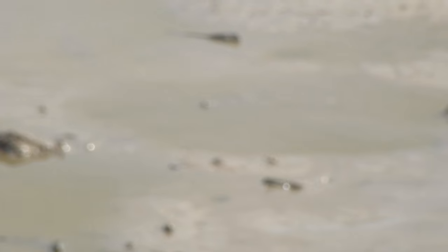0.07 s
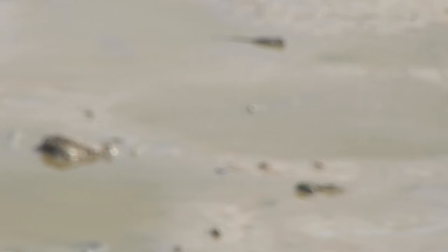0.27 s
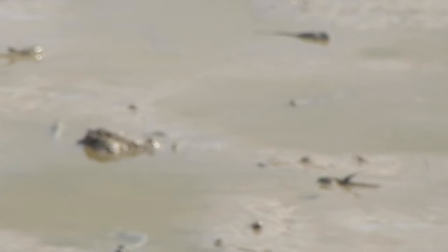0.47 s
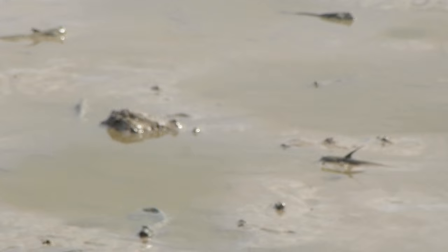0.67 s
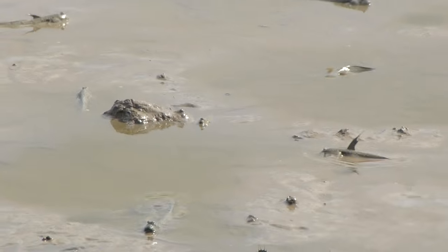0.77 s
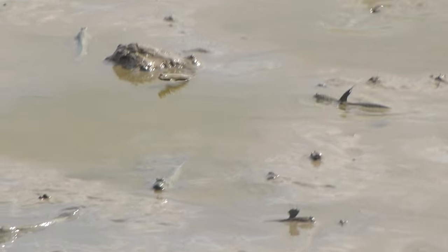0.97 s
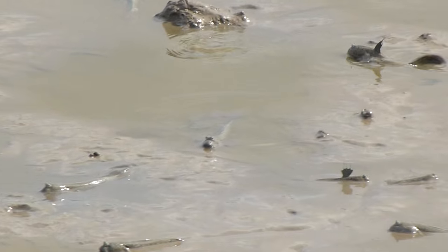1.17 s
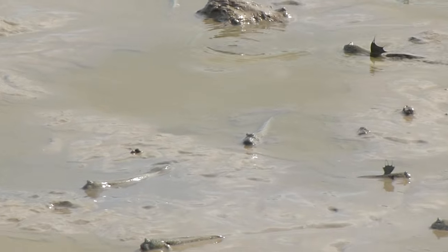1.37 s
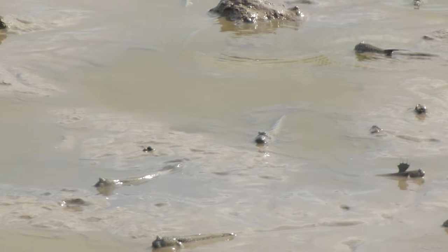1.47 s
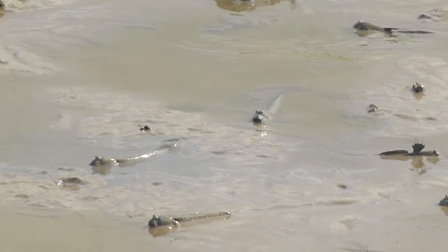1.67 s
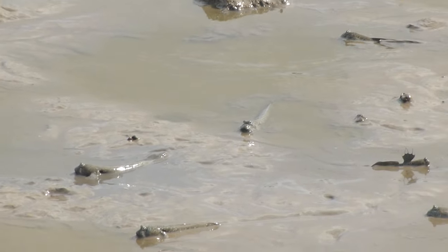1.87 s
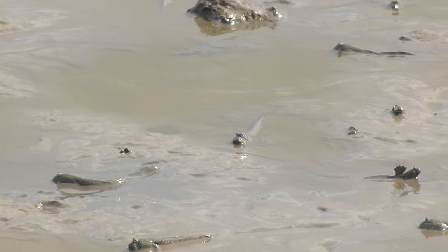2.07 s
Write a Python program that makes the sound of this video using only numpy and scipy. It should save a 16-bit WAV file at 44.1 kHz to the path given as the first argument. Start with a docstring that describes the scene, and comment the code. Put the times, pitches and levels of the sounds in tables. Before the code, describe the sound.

Low, gusty wind rumbles and thumps against the microphone on a tidal mudflat, heavier on the right. From the middle on, small wet smacks and bubble pops sound nearby, and the gusts ease near the end over a soft rush of air.

```python
"""Gusts of wind buffet a camera microphone on a tidal mudflat, mostly at its right port (opening).
The swirls of air rumble; the hardest ones thump, and the fastest rasp across the port's edge.
Close by, wet mud squelches and smacks, tiny bubbles pop, and one chirps as it surfaces.
A faint far tone rises twice as the wind drops. Under it all lie the even rush of open air
and the camera's faint whine; a thin high hiss stops just after the start."""
import sys
import numpy as np
from scipy import signal
from scipy.fft import rfft, irfft, next_fast_len
from scipy.io import wavfile
from scipy.ndimage import map_coordinates

SR = 44100
rng = np.random.default_rng(int(sys.argv[2]) if len(sys.argv) > 2 else 0)


def pcm_store(signal):
    """Save signal as 16-bit PCM."""
    levels = np.round(np.clip(np.atleast_2d(signal), -1, 1) * 32767)
    wavfile.write(sys.argv[1], SR, levels.astype(np.int16).T)


N = 92610  # 2.1 s

# tone colour of the open air, from low to high: f/Hz, level/dB
AIR_COLOUR = [(30, -29), (80, 12.5), (200, 6.5), (420, 2.5), (750, 1), (1050, -1.5), (1350, -7),
              (1800, -6.5), (2000, -8.5), (2300, -16.5), (2900, -19), (3600, -26.5), (4200, -22),
              (4900, -20), (5450, -22), (5900, -24), (8300, -24.5), (11000, -30), (15500, -35)]
# how alike left and right are in the air, hiss and squelches: f/Hz, likeness (1 = the same)
STEREO_LIKENESS = [(100, 0.69), (400, 0.62), (750, 0.83), (1100, 0.46), (8000, 0.6), (15000, 0.43)]
# how the air swells and sinks: t/s, relative level/dB
AIR_SWELL = [(0, -54), (.15, -53), (.26, -59), (.5, -56.5), (.7, -59), (1.0, -55.5), (1.1, -55.5),
             (1.3, -59.5), (1.55, -58), (1.82, -58.5), (2.1, -55)]
# tone colour of the thin hiss: f/Hz, level/dB
HISS_COLOUR = [(500, -8), (1500, 6.5), (3000, -5), (4000, -18), (6500, -4), (8000, 1), (10200, 2.5),
               (12000, -7), (15000, -19)]
# gusts at the microphone: start/s, end/s, strength/dB, extra treble/dB
GUSTS = [(0.061, 0.061, -34.5, 5.5), (0.193, 0.247, -22.5, 4), (0.25, 0.487, -27, -4.5),
         (0.5, 0.711, -27.5, -0.5), (.750, 0.841, -24, -2), (0.83, 0.892, -30.5, -15),
         (0.983, 1.071, -29.5, -7.5), (1.096, 1.348, -29, 3.5), (1.414, 1.502, -27, -4.5),
         (1.531, 1.708, -27.5, 4), (1.707, 1.829, -26.5, -1.5), (1.933, 2.007, -37.5, -16),
         (2.05, 2.09, -38, -24)]
# tone colour of wind buffeting a port: f/Hz, level/dB
BUFFET_COLOUR = [(25, -46), (48, -52), (70, -23.5), (100, -6), (135, -0.5), (210, 3), (340, -0.5),
                 (500, -16), (800, -26), (1300, -40), (2200, -67.5), (4000, -61.5), (10000, -77.5)]
# the left port's own buffeting, turned down by frequency: f/Hz, gain/dB
LEFT_PORT_GAIN = [(60, -19), (130, -9), (220, -18), (400, -12), (700, -7), (1500, -0.5)]
# how much of the right port's wind reaches the left channel: f/Hz, gain/dB
LEAK_GAIN = [(100, -4.5), (200, -12.5), (400, -19.5), (600, -7), (1000, -6), (1400, 2.5), (2000, -5)]
# how far that copy's waves run ahead: f/Hz, phase/rad
LEAK_PHASE = [(90, 1.68), (260, -1.5), (350, -5.5), (430, 1), (520, -3), (1350, -2.5), (1600, -2.4),
              (3000, -0.5)]
# the hardest swirls to hit the port: t/s, peak/dB, cutoff/Hz (higher is sharper)
THUMPS = [(0.052, -23, 650), (0.1788, -14, 790), (0.2015, -5, 610), (0.2265, -8.5, 470),
          (0.2345, -8.5, 1640), (0.2885, -10, 597), (0.3082, -6.5, 700), (0.392, -16, 610),
          (0.411, -11, 415), (0.436, -18.5, 665), (0.501, -22, 740), (0.5183, -14.5, 740),
          (0.532, -9.5, 370), (0.5708, -11.5, 660), (0.5789, -11.5, 610), (0.612, -19, 705),
          (0.6355, -8, 428), (0.647, -17, 510), (0.682, -31, 520), (0.7002, -13.5, 340), (0.763, -9.5, 416),
          (0.789, -14.5, 490), (0.886, -18.5, 507), (0.934, -15, 324), (0.992, -16.5, 550),
          (1.1041, -13, 448), (1.114, -9, 432), (1.182, -12, 700), (1.2114, -13, 730), (1.2204, -10, 520),
          (1.2531, -6.5, 582), (1.274, -15, 733), (1.2896, -16, 645), (1.302, -16, 485),
          (1.3270, -22, 1020), (1.3375, -6.5, 480), (1.418, -24, 744), (1.4985, -26, 440),
          (1.536, -13, 480), (1.577, -18, 620), (1.583, -11.5, 710), (1.6079, -9.5, 524),
          (1.618, -11.5, 660), (1.669, -12, 554), (1.704, -14.5, 1080), (1.7240, -12.5, 306),
          (1.7905, -8.5, 370), (1.939, -23, 800), (2.0052, -19.5, 287)]
# air tearing across the port's edge: t/s, width/s, level/dB
RASPS = [(0.18, 0.0035, -34), (0.201, 0.0029, -35), (0.447, .003, -34.5), (0.993, 0.0029, -40),
         (1.11, 0.011, -36), (1.188, 0.0089, -35.5), (1.2523, 0.0027, -28), (1.291, 0.0018, -36.5),
         (1.329, 0.0037, -28), (1.335, 0.0023, -33), (1.567, 0.0013, -24), (1.583, 0.0047, -36),
         (1.603, 0.0056, -38.5), (1.619, 0.0036, -33), (1.7064, 0.0033, -26.5)]
# tone colour of the rasps: f/Hz, level/dB
RASP_COLOUR = [(350, -18), (700, 6), (1150, 4), (1450, -8.5), (1900, -19), (2600, -34.5), (5000, -45)]
# soft squelches in the mud: t/s, width/s, level/dB
SQUELCHES = [(0.869, 0.25, -67), (1.515, 0.0094, -58), (1.635, 0.035, -60.5)]
# tone colour of the squelches: f/Hz, level/dB
SQUELCH_COLOUR = [(2000, -16), (3500, 2), (5200, 5), (7000, -5.5), (14000, -18)]
# wet smacks of mud: t/s, level/dB, fade time/s
SMACKS = [(0.9257, -28.5, 0.013), (0.9409, -21.5, 0.013)]
# tone colour of the smacks: f/Hz, level/dB
SMACK_COLOUR = [(500, -10), (1300, -15), (1800, -3.5), (2400, -12), (3000, -16), (3700, -18.5), (4800, -26),
                (5450, -5.5), (5900, -13), (6600, -13), (7600, -24), (8600, -19.5), (10500, -27.5),
                (15000, -31)]
# tiny bubbles bursting; the first two rows are the ringing of the two mud smacks: t/s, level/dB, f/Hz, fade
# time/s, left minus right/dB
POPS = [(.9261, -30, 3240, 0.005, -3), (.9416, -21, 2300, 0.0075, -5), (1.039, -37, 6200, 0.0015, -1.5),
        (1.5474, -26, 7850, .0045, -9), (1.5484, -29.5, 4500, 0.008, -4.5), (1.5484, -44, 6100, 0.012, -5),
        (1.9843, -23, 4900, 0.0022, -6.5), (1.9862, -32, 3400, 0.003, -5)]
# one surfacing bubble: t/s, length/s, first f/Hz, last f/Hz, peak/dB
CHIRP = (1.461, .021, 2000, 3300, -56)
# faint far tones: t/s, length/s, first f/Hz, last f/Hz, peak/dB
FAR_TONES = [(1.875, .075, 639, 726, -47), (1.985, 0.077, 572, 678, -46.5)]

TIME = np.arange(N) / SR  # seconds, one value per sample


def amp(db):
    """Turn decibels into a number to multiply by."""
    return 10 ** (np.asarray(db) / 20)


def unit(x):
    """Scale a signal to an average (rms) size of 1."""
    return x / np.sqrt(np.mean(x ** 2) + 1e-20)


def along(points, hz):
    """Read between a table's rows on a log frequency scale."""
    freqs, values = np.transpose(points)
    return np.interp(np.log(hz + 1), np.log(freqs + 1), values)


def wobble(rate):
    """A smooth curve through `rate` random values a second."""
    return map_coordinates(rng.standard_normal(int(N * rate / SR) + 4), [np.arange(N) * rate / SR])


def filtered(x, response):
    """Multiply each frequency in x by response(hz)."""
    size = next_fast_len(N + SR // 2)
    return irfft(rfft(x, size) * response(np.fft.rfftfreq(size, 1 / SR)), size)[..., :N]


def causal(points, hz):
    """A response with the table's gains that rings only after a push (minimum phase)."""
    cepstrum = irfft(np.log(amp(along(points, hz))))
    half = len(cepstrum) // 2
    cepstrum[1:half] *= 2
    cepstrum[half + 1:] = 0
    return np.exp(rfft(cepstrum))


def slope(hz, kind, order):
    """A filter that keeps the "low" or the "high" side of hz."""
    return signal.butter(order, hz, kind, fs=SR, output="sos")


def rush(colour, likeness):
    """Stereo noise with a given tone colour and left-right likeness."""
    def response(hz):
        angle = np.arccos(np.clip(along(likeness, hz), -1, 1)) / 2
        return amp(along(colour, hz)) * [np.cos(angle), np.sin(angle)]
    shared, side = filtered(rng.standard_normal((2, N)), response)
    return unit(np.array([shared + side, shared - side]))


def burst(start, rise_s, fade_s):
    """A loudness shape that jumps up, then falls 60 dB every fade_s."""
    age = np.maximum(TIME - start, 0)
    return (1 - np.exp(-age / rise_s)) * amp(-60 * age / fade_s)


def swells(rows):
    """A loudness shape with one smooth hump per row."""
    return sum(amp(db) * np.exp(-((TIME - t) / width) ** 2) for t, width, db in rows)


def glide(row, waver_rad):
    """A short wavering tone that swells and fades while its pitch slides."""
    start, length, first_hz, last_hz, db = row
    progress = np.clip((TIME - start) / length, 0, 1)
    hz = first_hz + (last_hz - first_hz) * progress
    phase = 2 * np.pi * np.cumsum(hz) / SR + waver_rad * wobble(910)
    return amp(db) * np.sin(np.pi * progress) * np.sin(phase)


def air(boost_db=11.5, waver_db=0.7):
    """Air rushes over the open flat, gently wavering."""
    level_db = np.interp(TIME, *np.transpose(AIR_SWELL)) + boost_db + waver_db * wobble(11.67)
    return amp(level_db) * rush(AIR_COLOUR, STEREO_LIKENESS)


def hiss(db=-56, end_s=0.113, fade_s=0.0069):
    """A thin high hiss that stops early."""
    fade = np.clip((end_s - TIME) / fade_s + 1, 0, 1)
    return amp(db) * fade * rush(HISS_COLOUR, STEREO_LIKENESS)


def whine(hz=8000, db=-84):
    """A steady thin tone inside the camera."""
    return amp(db) * unit(np.sin(2 * np.pi * hz * TIME))


def gusts(rise_db_per_s=533, fall_db_per_s=486, lull_db=-67.5):
    """Wind strength and extra treble: each gust rises, holds and falls back to the lull."""
    start, end, db, treble_db = np.transpose(GUSTS)[..., None]
    before, after = np.maximum(start - TIME, 0), np.maximum(TIME - end, 0)
    each = amp(db - rise_db_per_s * before - fall_db_per_s * after) + 1e-9
    strength = np.maximum(each.max(0), amp(lull_db))
    treble = amp((each * treble_db).sum(0) / each.sum(0))  # the strongest gust counts most
    return strength, treble


def buffeting(lumpy_db=1.5, flutter_db=8, split_hz=247):
    """Swirls of air push unevenly on one port; the higher part flutters faster and deeper."""
    strength, treble = gusts()
    swirls = rng.standard_normal(N) * amp(lumpy_db * wobble(70))
    pressure = unit(filtered(swirls, lambda hz: causal(BUFFET_COLOUR, hz)))
    low = filtered(pressure, lambda hz: 1 / (1 + (hz / split_hz) ** 4))
    flutter = unit(amp(flutter_db * np.tanh(wobble(110))))
    return strength * (low + (pressure - low) * treble * flutter)


def wind(right_boost_db=5.5):
    """The right port takes the wind; the left gets a weaker, shifted copy plus its own swirls."""
    right, left = buffeting(), buffeting()
    right = amp(right_boost_db) * right + thumps() + rasps()
    left = filtered(left, lambda hz: amp(along(LEFT_PORT_GAIN, hz)))
    leak = filtered(right, lambda hz: amp(along(LEAK_GAIN, hz)) * np.exp(1j * along(LEAK_PHASE, hz)))
    return np.array([left + leak, right])


def thumps(port_hz=236, bass_cut_hz=149, crack_db=-14):
    """Pressure spikes, dulled by the port, ring briefly in the microphone's bass-cut filter."""
    out = np.zeros(N)
    microphone = np.vstack([slope(port_hz, "low", order=1), slope(bass_cut_hz, "high", order=3)])
    push = signal.sosfilt(microphone, signal.unit_impulse(SR // 20))
    for t, db, cutoff_hz in THUMPS:
        thud = signal.sosfilt(slope(cutoff_hz, "low", order=6), push)
        crack = signal.sosfilt(slope(cutoff_hz, "low", order=2), push)  # keeps more treble
        spike = thud + amp(crack_db) * crack
        start = round(t * SR) - np.abs(spike).argmax()  # the peak lands at t
        out[start:][:len(spike)] += amp(db) * spike / np.abs(spike).max()
    return out


def rasps():
    """Short rough bursts where the fastest swirls tear across the port."""
    noise = filtered(rng.standard_normal(N), lambda hz: amp(along(RASP_COLOUR, hz)))
    return swells(RASPS) * unit(noise)


def squelches(crackle_db=2.5):
    """Wet mud shifts with a faint fine crackle."""
    crackle = unit(amp(crackle_db * wobble(340)))
    return swells(SQUELCHES) * crackle * rush(SQUELCH_COLOUR, STEREO_LIKENESS)


def smacks(rise_s=0.0001):
    """Wet mud parts in a quick double smack."""
    loudness = sum(amp(db) * burst(t, rise_s, fade_s) for t, db, fade_s in SMACKS)
    return loudness * rush(SMACK_COLOUR, likeness=[(2000, 0.039), (8000, 0.17)])


def pops_and_rings(rise_s=0.00033, spray_db=-15):
    """Bursting bubbles and the mud smacks ring briefly, each with a puff of spray."""
    out = np.zeros((2, N))
    spray = rush(colour=[(1500, -87), (4000, 10.5), (9000, 5), (15000, -15)], likeness=[(5000, 0.59)])
    for t, db, hz, fade_s, pan_db in POPS:
        pop = np.sin(2 * np.pi * hz * (TIME - t)) + amp(spray_db) * spray
        left_right = amp([[db + pan_db / 2], [db - pan_db / 2]])
        out += left_right * burst(t, rise_s, fade_s) * pop
    return out


def bubble_chirp():
    """One bubble rises in pitch as it surfaces."""
    return glide(CHIRP, waver_rad=0.57)


def far_tones():
    """A faint tone rises twice, perhaps a distant shore bird."""
    return sum(glide(row, waver_rad=0.78) for row in FAR_TONES)


def scene():
    """All the sounds added together, in stereo."""
    return (wind() + air() + hiss() + smacks() + pops_and_rings() + bubble_chirp()
            + squelches() + far_tones() + whine())


def record(dry):
    """The camera keeps nothing above 15900 Hz."""
    return filtered(dry, lambda hz: hz < 15900)


dry = scene()
out = record(dry)
pcm_store(out)
```